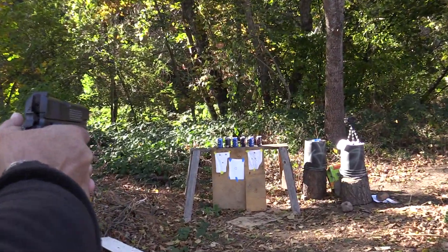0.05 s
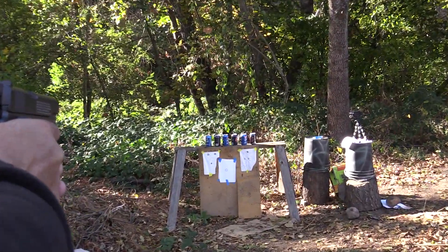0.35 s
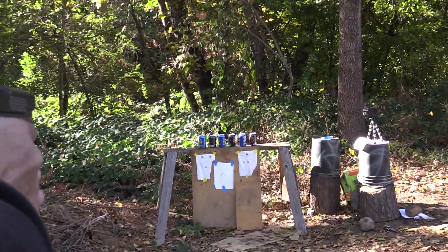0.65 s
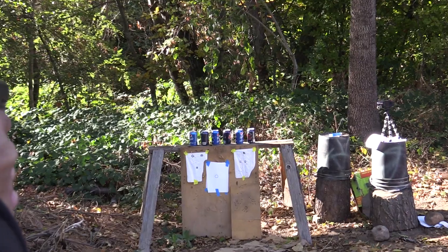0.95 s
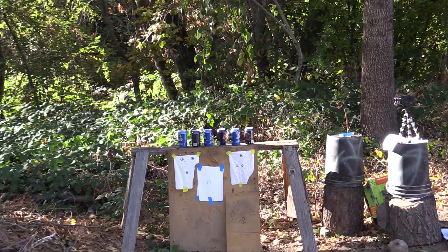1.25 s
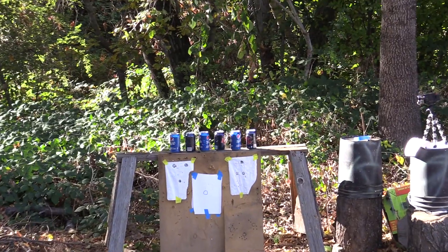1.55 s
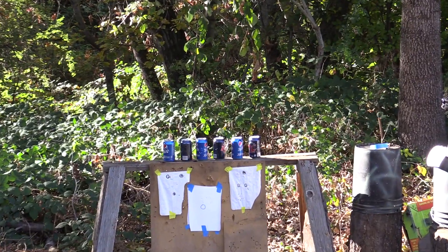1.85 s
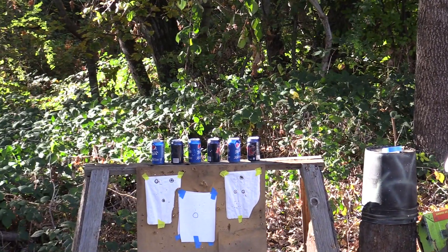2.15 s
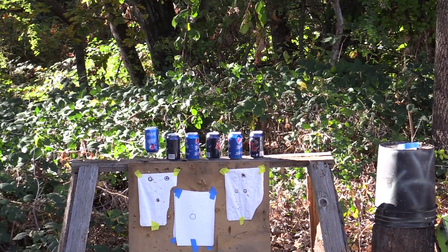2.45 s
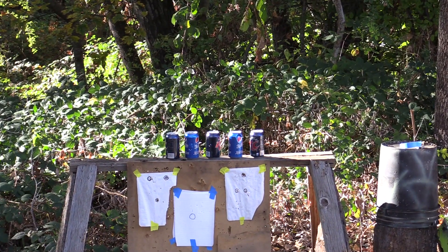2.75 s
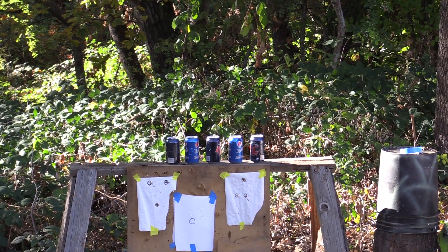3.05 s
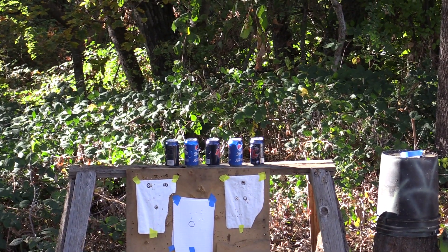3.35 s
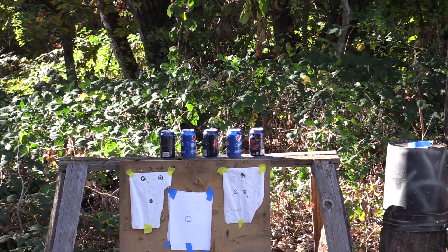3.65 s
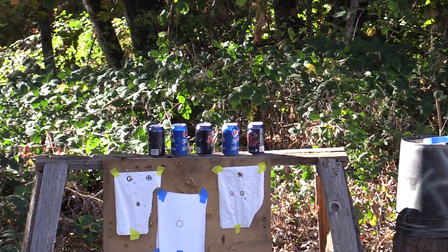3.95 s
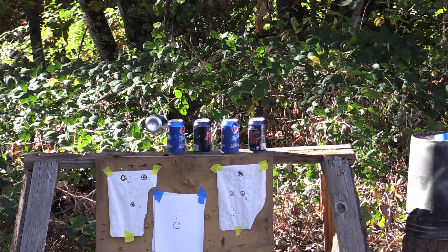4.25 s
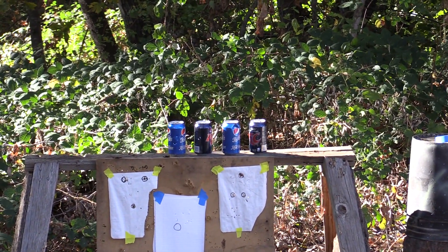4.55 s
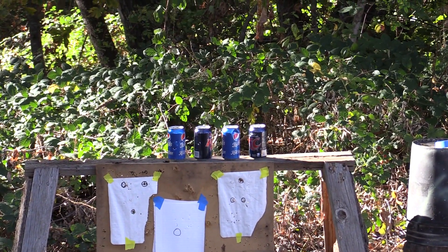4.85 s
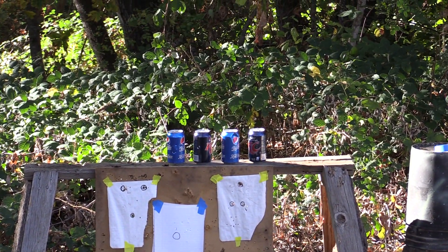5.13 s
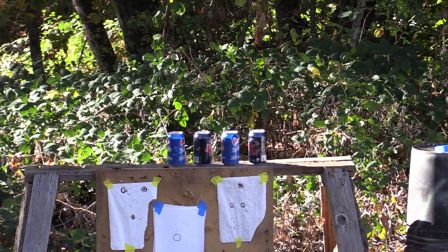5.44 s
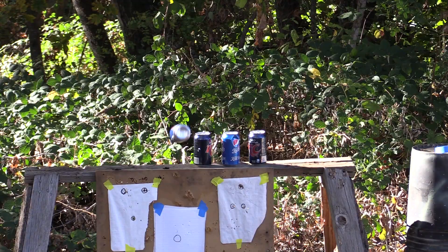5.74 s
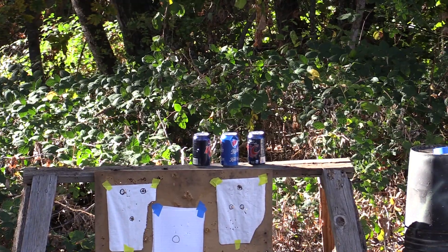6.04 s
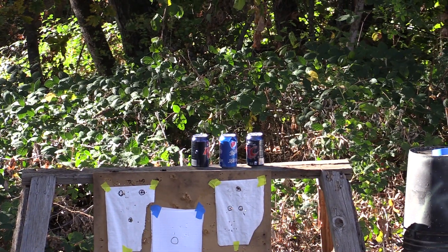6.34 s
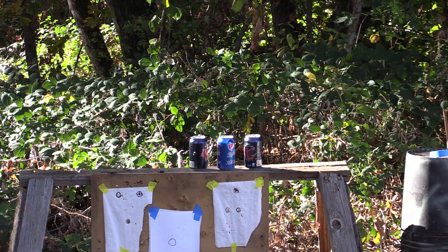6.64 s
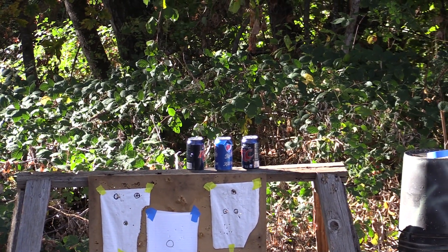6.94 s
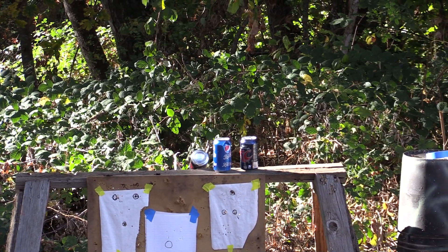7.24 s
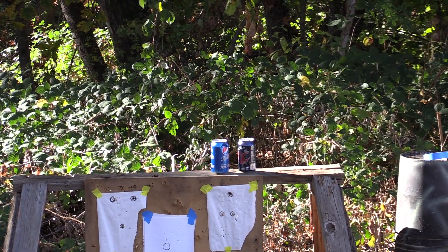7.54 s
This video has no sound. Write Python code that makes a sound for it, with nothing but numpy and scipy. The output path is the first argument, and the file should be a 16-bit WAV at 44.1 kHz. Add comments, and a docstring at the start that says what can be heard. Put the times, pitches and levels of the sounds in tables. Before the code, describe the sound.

Close to the microphone, a gas BB pistol fires five evenly paced shots at the edge of a wood. Each is a sharp, puffing crack with a metallic slide clack and an echo off the trees, followed by a small trigger click. The first misses; the next four pop against empty cans farther away, which topple and drop into dry leaves. Faint traffic, far engines and a light leafy hiss lie behind.

```python
"""A CO2 blowback pistol fires five BBs at empty drink cans on a plank at the edge of a wood.
Each shot: hammer, a crack with two gas puffs, the slide rattling back and slamming shut, a tree echo.
The first BB misses; four cans are hit, topple and drop into dry leaves. A stray BB pings on metal.
Behind it: far traffic and engines, air in the leaves, one bird chip, a soft bump of the hand."""
import sys
import numpy as np
from scipy import signal
from scipy.fft import rfft, irfft
from scipy.io import wavfile

SR = 44100
rng = np.random.default_rng(int(sys.argv[2]) if len(sys.argv) > 2 else 0)


def waveform_to_disk(signal):
    """Save audio, clipped to [-1, 1], as 16-bit WAV at the path in sys.argv[1]."""
    frames = np.transpose(np.atleast_2d(signal))
    scaled = np.clip(frames, -1, 1) * 32767
    samples = np.round(scaled).astype(np.int16)
    wavfile.write(sys.argv[1], SR, samples)


N = 334719
TIME = np.arange(N) / SR

# Table levels are relative within their layer.
# Each row: crack time in s, slide level in dB, echo level in dB, trigger release in s, its level in dB.
SHOTS = [(0.57, -8, -3, 0.9005, -9.5), (2.3810, -6.5, 1.5, 2.65, -10), (4.178, -8, -1, 4.4440, -9),
         (5.6846, -8.5, 0.5, 5.9625, -9), (7.0112, -7.5, -0.5, 7.13, -10.5)]
# BBs on cans. Each row: start in s, wall level in dB, wall pitch in Hz, crunch, echo and topple in dB.
HITS = [(2.4770, -4, 696, -3.5, 1.5, -34), (4.2743, 7, 628, -5, 0, -20), (5.7818, 6, 621, -3.5, -1.5, -23),
        (7.11, 2, 690, -3.5, 1, -39)]
# Drops into leaves. Each row: start in s, rustle in dB, its decay in s, knock in dB, its pitch in Hz.
LANDINGS = [(2.952, -27, 0.071, -30, 700), (3.342, -23, 0.03, -42, 1000), (3.771, -35.5, .04, -43, 700),
            (4.810, -26, 0.042, -22, 760), (6.235, -35.5, 0.034, -25, 594), (6.318, -36, 0.052, -14, 389)]
# Steel contacts. Each row, as in every spectrum here: frequency in Hz, level in dB.
STEEL_SPECTRUM = [(200, -28), (600, -12), (1100, 1), (2000, -0.5), (3400, 2), (5000, -6), (8000, -6),
                  (11000, -11), (15500, -12.5)]
# Echo off the trees.
ECHO_SPECTRUM = [(100, -23), (300, -8), (600, -2), (1100, -1), (1900, -3.5), (2500, -3.5), (3000, -2.5),
                 (3500, 4), (4100, -3.5), (5500, -7.5), (8000, -11.5), (11000, -18), (15500, -27.5)]


def from_db(db):
    """Decibels to gain."""
    return 10 ** (np.asarray(db) / 20)


def in_time(rows):
    """Curve columns at every sample; the first column is time in s."""
    s, *columns = np.transpose(rows)
    return [np.interp(TIME, s, c) for c in columns]


def at_hz(points, hz):
    """Interpolate on a log-frequency axis."""
    f, value = np.transpose(points)
    return np.interp(np.log(np.maximum(hz, 1)), np.log(f), value)


def colour(x, spectrum, size=8192):
    """Minimum-phase filter of this spectral shape; white noise keeps its power."""
    cepstrum = irfft(np.log(from_db(at_hz(spectrum, np.fft.rfftfreq(size, 1 / SR)))))
    cepstrum[1:size // 2] *= 2
    cepstrum[size // 2 + 1:] = 0
    response = irfft(np.exp(rfft(cepstrum)))
    return signal.oaconvolve(x, response / np.linalg.norm(response))[:len(x)]


def bursts(rows, rise_s=0.00016):
    """Dense random micro-impacts. Each row: start in s, level in dB, decay in s."""
    power = np.zeros(N)
    for s, db, decay_s in rows:
        span = slice(int(s * SR) + 1, int((s + 10 * decay_s) * SR))
        t = TIME[span] - s
        power[span] += (from_db(db) * np.exp(-t / decay_s) * (1 - np.exp(-t / rise_s))) ** 2
    return np.sqrt(power) * rng.choice([-1, 1], N)


def bounces(s, db, decay_s, gap_s, count, step_db=0, gap_ratio=1):
    """Burst rows for a run of contacts; each adds step_db and scales the gap by gap_ratio."""
    return [(s + gap_s * sum(gap_ratio ** j for j in range(k)), db + k * step_db, decay_s)
            for k in range(count)]


def each_shot(rows):
    """Repeat rows timed from the crack for every shot."""
    return [(shot[0] + delay_s, *rest) for shot in SHOTS for delay_s, *rest in rows]


def resonate(x, modes, size=4096):
    """Parallel resonances, unit power gain. Each mode: frequency in Hz, width in Hz, level in dB."""
    t = TIME[:size]
    response = sum(from_db(db) * width_hz * np.exp(-np.pi * width_hz * t) * np.cos(2 * np.pi * hz * t)
                   for hz, width_hz, db in modes)
    return signal.oaconvolve(x, response / np.linalg.norm(response))[:N]


def struck(s, modes, size=16384):
    """Damped sines from time s. Each mode: frequency in Hz, level in dB, T60 in s."""
    t, start = TIME[:size], round(s * SR)
    ring = sum(from_db(db - 60 * t / t60_s) * np.sin(2 * np.pi * hz * t) for hz, db, t60_s in modes)
    out = np.zeros(N + size)
    out[start:start + size] = -ring
    return out[:N]


def drift(rate_hz):
    """Straight lines between unit-variance random points."""
    count = int(rate_hz * N / SR) + 2
    return np.interp(TIME * rate_hz, np.arange(count), rng.standard_normal(count))


def woods(x, onset_s, early_db, lumpy_db, size=44100):
    """Leaf and trunk scatter: offset by early_db until the trees answer at onset_s, then decaying."""
    # Each row: frequency in Hz, T60 in s.
    ring_times = [(200, 0.88), (1000, 0.62), (2200, 0.64), (3400, 0.64), (5000, 0.55), (8000, 0.43),
                  (15000, 0.39)]
    t, hz = TIME[:size], np.fft.rfftfreq(size, 1 / SR)
    trunks = np.repeat(from_db(lumpy_db * rng.standard_normal(size)), 40)[:size]
    scatter = rfft(rng.standard_normal(size) * trunks)
    response = np.zeros(size)
    for k, (_, t60_s) in enumerate(ring_times):
        band = at_hz([(f, j == k) for j, (f, _) in enumerate(ring_times)], hz)
        response += irfft(scatter * band, size) * from_db(-60 * np.maximum(t - onset_s, 0) / t60_s)
    response *= from_db(early_db * np.clip(4 * (1 - t / onset_s), 0, 1))
    return signal.oaconvolve(x, response / np.linalg.norm(response))[:N]


def traffic():
    """Far road rumble and tyre hiss."""
    # Each row: time in s, rumble in dB, tyre hiss in dB.
    levels = [(0, -38.5, -37), (1.5, -40, -36), (2.3, -42, -38), (5.3, -43, -38.5), (6.2, -42.5, -39.5),
              (6.8, -42, -42), (7.59, -42, -41.5)]
    rumble_spectrum = [(20, 6), (40, 0), (70, -3), (135, -1), (200, -2.5), (350, -1.5), (600, -5.5),
                       (800, -23), (1300, -62.5)]
    tyre_spectrum = [(290, -34.5), (500, -17.5), (641, -4.5), (785, -5), (954, -2), (1260, -0.5),
                     (1430, -3.5), (1880, -12), (2500, -24), (3250, -59), (5500, -120)]
    rumble_db, tyre_db = in_time(levels)
    rumble = from_db(rumble_db + drift(6.7)) * colour(rng.standard_normal(N), rumble_spectrum)
    tyres = from_db(tyre_db + 0.67 * drift(9.6)) * colour(rng.standard_normal(N), tyre_spectrum)
    return rumble + tyres


def air():
    """Steady hiss of air in the leaves."""
    hiss_spectrum = [(1290, -22), (2200, 0), (2490, -3), (2750, -3.5), (3280, 0), (4920, -12.5),
                     (13900, -23.5), (15200, -25), (16000, -29)]
    return from_db(-48) * colour(rng.standard_normal(N), hiss_spectrum)


def engines():
    """Two far firing tones waver through the air: one speeds up and fades, a deeper one draws near."""
    # Each row: time in s, pitch in Hz, RMS level in dB.
    receding = [(0, 122, -35), (1.8, 124.3, -36), (2.3, 127.5, -44), (2.9, 130.3, -44.5),
                (3.6, 130.2, -51.5), (7.59, 136.9, -56)]
    nearing = [(0, 76, -72), (5.7, 76, -52), (6.6, 80, -52.5)]
    out = np.zeros(N)
    for curve, waver_db in [(receding, 1.3), (nearing, 2.0)]:
        hz, db = in_time(curve)
        out += np.sqrt(2) * from_db(db + waver_db * drift(9)) * np.sin(2 * np.pi * np.cumsum(hz) / SR)
    return out


def action():
    """The hammer falls; gas drives the slide back to its stop; the spring scrapes it forward."""
    clatter_spectrum = [(200, -15.5), (600, -16), (1100, -3), (2000, -3), (2900, 2), (3600, 1), (4400, -9),
                        (7500, -7.5), (11000, -13), (15500, -16)]
    hammer = bounces(s=-0.0078, db=-16.5, decay_s=0.0019, gap_s=0.00173, count=3, step_db=6)
    blowback = bounces(s=0.00597, db=-6.5, decay_s=0.002, gap_s=0.00486, count=3)
    rear_stop = [(0.0303, -12, 0.0024)]
    forward = bounces(s=0.0415, db=-15, decay_s=0.004, gap_s=0.00497, count=3)
    return colour(bursts(each_shot(hammer + blowback + rear_stop + forward)), clatter_spectrum)


def muzzle_crack():
    """Two sharp noise bursts at the muzzle per shot."""
    # Each row: offset from the crack time in s, level in dB, decay in s.
    cracks = [(-0.0023, 0.5, 0.00083), (-0.0001, 3, 0.0012)]
    blast_spectrum = [(150, 1), (400, -0.5), (1000, 1.5), (2000, -6), (3200, 3.5), (4500, -7), (7500, -9.5),
                      (11000, -19), (15500, -23)]
    return colour(bursts(each_shot(cracks)), blast_spectrum)


def gas_puffs(damping=0.39):
    """Gas from muzzle and breech pushes the air once; the pressure swings under and back."""
    # Each row: offset from the crack time in s, push in dB, width in s, natural frequency in Hz.
    puffs = [(-0.0024, -4, 0.00055, 134), (0.0063, 1, 0.00031, 170)]
    out = np.zeros(N)
    for s, db, width_s, hz in each_shot(puffs):
        span = slice(int((s - 0.01) * SR), int((s + 0.05) * SR))
        push = from_db(db) * np.exp(-0.5 * ((TIME[span] - s) / width_s) ** 2)
        w = 2 * np.pi * hz
        highpass = signal.bilinear([1, 0, 0], [1, 2 * damping * w, w * w], SR)
        out[span] += signal.lfilter(*highpass, push)
    return out


def recoil(delay_s=0.0375, db=-10.5, decay_s=0.0018, hz=1080, width_hz=240):
    """The frame knocks dully in the hand."""
    knocks = bursts(each_shot([(delay_s, db, decay_s)]), rise_s=0.00066)
    return resonate(knocks, [(hz, width_hz, 0)])


def slide_slam(delay_s=0.0564):
    """The steel slide slams shut, rebounds once and rings."""
    # Each row: frequency in Hz, width in Hz, level in dB.
    slide_modes = [(1440, 210, -11.5), (2850, 180, 14), (3500, 300, -10), (4600, 180, -4), (5350, 150, -20),
                   (7160, 490, -1), (9200, 250, -19), (12400, 400, -19), (14200, 500, -12)]
    contacts = []
    for s, db, *_ in SHOTS:
        contacts += bounces(s + delay_s, db, decay_s=0.0034, gap_s=0.0059, count=2, step_db=-7)
    slam = bursts(contacts, rise_s=0.00058)
    return from_db(3) * resonate(slam, slide_modes) + from_db(1) * colour(slam, STEEL_SPECTRUM)


def report_echo():
    """The muzzle points at the wood, so its report returns far stronger than the clatter."""
    reports = np.zeros(N)
    for s, _, db, *_ in SHOTS:
        reports[round(s * SR)] = from_db(db + 16.5)
    return woods(colour(reports, ECHO_SPECTRUM), onset_s=0.13, early_db=-12.5, lumpy_db=3.5)


def bb_impacts(lowest_hz=430, tear_decay_s=0.0029):
    """BBs miss, graze, or boom and tear a thin can wall; the bushes behind scatter each hit."""
    # Misses and grazes. Each row: start in s, level in dB, decay in s.
    glances = [(0.6785, -16, .005), (2.4742, -4.5, 0.0033)]
    # Each row: multiple of the wall pitch, level in dB, T60 in s.
    wall_modes = [(.74, -24.5, 0.029), (.95, -5.5, 0.019), (1.1, -3.5, 0.014), (1.02, -25.5, 0.2),
                  (1.5, -26.5, .1), (1.9, -5, 0.015), (3.9, -18, 0.016), (5.2, -13, 0.023)]
    crunch_spectrum = [(200, -7), (500, 2.5), (1200, -5), (2000, 2), (3000, 5.5), (4500, -6), (8000, -11),
                       (15500, -27)]
    walls, pops, tears = np.zeros(N), np.zeros(N), []
    for s, wall_db, hz, crunch_db, echo_db, _ in HITS:
        walls += struck(s, [(hz * ratio, wall_db + db, t60_s) for ratio, db, t60_s in wall_modes])
        tears.append((s, crunch_db, tear_decay_s))
        pops[round(s * SR)] = from_db(echo_db + 14)
    highpass = signal.butter(2, lowest_hz, "high", fs=SR, output="sos")  # cans radiate little bass
    walls = signal.sosfilt(highpass, walls)
    crunch = signal.sosfilt(highpass, colour(bursts(tears + glances), crunch_spectrum))
    to_bushes = colour(pops, ECHO_SPECTRUM) + from_db(-14.5) * walls
    return walls + crunch + woods(to_bushes, onset_s=0.047, early_db=-8.5, lumpy_db=2.5)


def trigger(tick_lead_s=0.018, tick_decay_s=0.001):
    """On release the spring ticks faintly, then the trigger snaps back with one rebound."""
    contacts = []
    for *_, s, db in SHOTS:
        contacts.append((s - tick_lead_s, db - 24, tick_decay_s))
        contacts += bounces(s, db, decay_s=0.0018, gap_s=0.0025, count=2, step_db=-3.5)
    return colour(bursts(contacts, rise_s=0.00051), STEEL_SPECTRUM)


def bird():
    """One short, dry chip."""
    # Each row: start in s, level in dB, decay in s.
    chips = [(2.0315, -27, 0.0028)]
    chip_spectrum = [(2000, -35), (2950, 0), (3300, -8), (4200, -45)]
    return colour(bursts(chips, rise_s=0.0012), chip_spectrum)


def can_knocks(topple_delay_s=0.15, topple_ratio=1.07, topple_decay_s=0.0084, thud_decay_s=0.0063):
    """Hollow cans topple on the plank and thud on landing; the first can's wall rings on after the hit, then it
    spins off ringing."""
    # The first can: its wall rings on after the hit, then it spins off the plank ringing. Each row: start in s,
    # level in dB, pitch in Hz, decay in s.
    first_can_rings = [(2.493, -17, 676, 0.022), (2.610, -25.5, 1062, 0.092)]
    # Each row: multiple of the knock pitch, width in Hz, level in dB.
    knock_modes = [(1, 45, 1.5), (1.5, 22, 3), (2.6, 200, -11), (4.5, 400, -27)]
    knock_spectrum = [(100, -10), (300, 7.5), (2200, -6), (4000, -14), (12000, -21)]
    topples = [(s + topple_delay_s, db, hz * topple_ratio, topple_decay_s) for s, _, hz, *_, db in HITS]
    thuds = [(s, db, hz, thud_decay_s) for s, _, _, db, hz in LANDINGS]
    knocks = np.zeros(N)
    for s, db, hz, decay_s in topples + thuds + first_can_rings:
        modes = [(hz * ratio, width_hz, mode_db) for ratio, width_hz, mode_db in knock_modes]
        knocks += resonate(bursts([(s, db, decay_s)]), modes)
    return from_db(-9) * colour(knocks, knock_spectrum)


def leaves(crackle_db=1.5, rise_share=0.12):
    """Dry leaves crackle under the first can's skips and under every landing."""
    rustle_spectrum = [(150, -21), (500, -3.5), (900, 2.5), (1800, -3), (3200, 5.5), (4500, -7.5),
                       (8000, -16), (15000, -27.5)]
    hops = bounces(s=2.7, db=-27, decay_s=0.035, gap_s=0.063, count=4, step_db=0.7, gap_ratio=0.58)
    skips = bursts(hops, rise_s=0.0011)
    drops = sum(bursts([(s, db, decay_s)], rise_s=rise_share * decay_s)
                for s, db, decay_s, *_ in LANDINGS)
    return colour((skips + drops) * from_db(crackle_db * drift(400)), rustle_spectrum)


def stray_ping(start_s=3.3064, tick_db=-20, tick_decay_s=0.0023):
    """A stray BB on metal: bright tick and thin ring, scattered by the bushes."""
    # Each row: frequency in Hz, level in dB, T60 in s.
    metal_modes = [(3569, -23, 0.025), (8000, -36, .1), (7940, -17, 0.0081), (8400, -37, .12),
                   (9850, -40, .15)]
    tick_spectrum = [(2000, -20), (3400, 0), (5000, -10), (7600, -3), (10500, -19), (15500, -30)]
    tick = colour(bursts([(start_s, tick_db, tick_decay_s)]), tick_spectrum)
    ping = tick + struck(start_s, metal_modes)
    return ping + from_db(-4) * woods(ping, onset_s=0.02, early_db=2, lumpy_db=-2)


def handling():
    """The hand bumps softly near the microphone."""
    # Each row: start in s, level in dB, decay in s.
    bumps = [(5.585, -23, 0.015)]
    bump_spectrum = [(20, -2), (40, 0), (100, -10), (300, -11), (1500, -16), (3000, -23), (6000, -50),
                     (15000, -53)]
    return colour(bursts(bumps, rise_s=0.0015), bump_spectrum)


def scene():
    """Mono mix: pistol close by, cans downrange, background beyond."""
    gun = muzzle_crack() + action() + recoil() + slide_slam() + trigger()
    near_scatter = from_db(-15.5) * woods(gun, onset_s=0.022, early_db=2, lumpy_db=7.5)
    downrange = report_echo() + bb_impacts() + can_knocks() + leaves() + stray_ping()
    background = traffic() + air() + engines() + bird()
    return (gun + gas_puffs() + near_scatter + downrange + handling() + background)[None]


def record(dry, ceiling=0.98, cutoff_hz=15900):
    """Soft input overload on the loudest peaks, then a steep low-pass."""
    clipped = dry / (1 + (dry / ceiling) ** 6) ** (1 / 6)
    return signal.sosfilt(signal.ellip(10, 0.2, 70, cutoff_hz, fs=SR, output="sos"), clipped)


dry = scene()
out = record(dry)
waveform_to_disk(out)
```